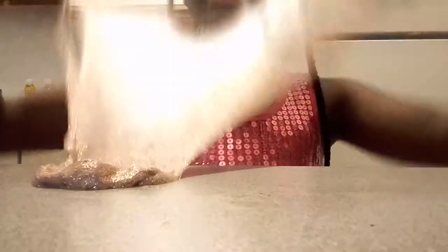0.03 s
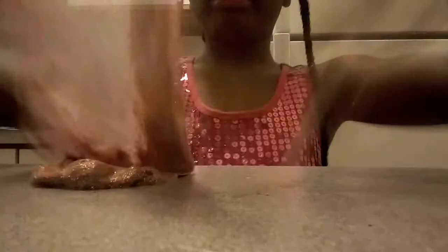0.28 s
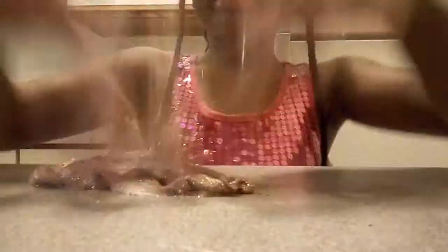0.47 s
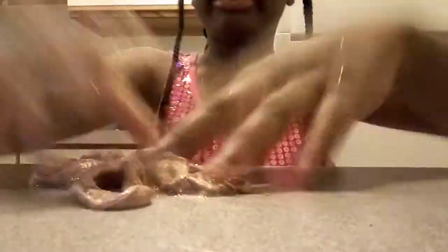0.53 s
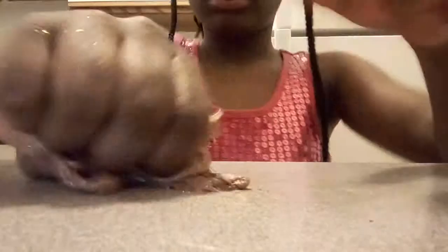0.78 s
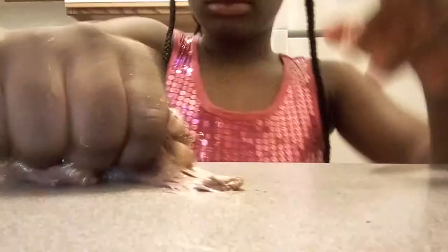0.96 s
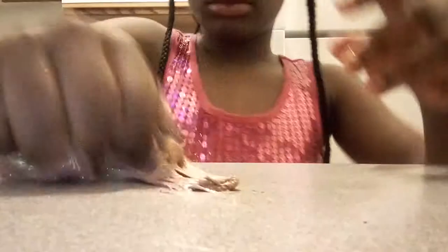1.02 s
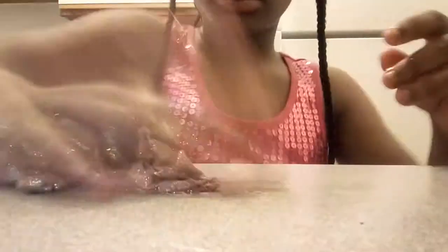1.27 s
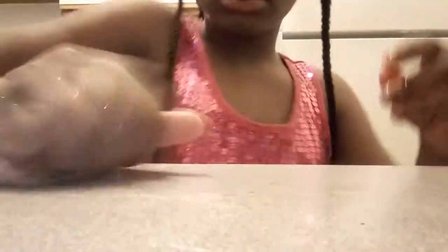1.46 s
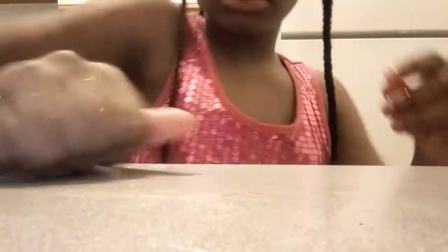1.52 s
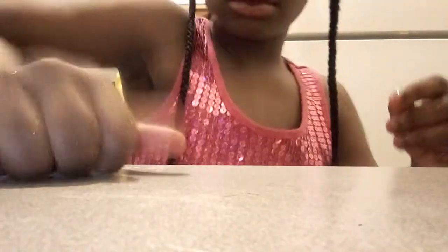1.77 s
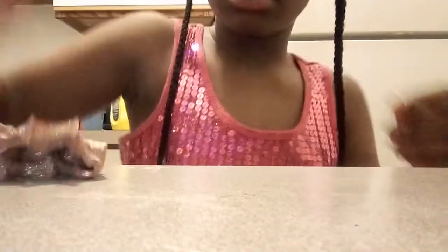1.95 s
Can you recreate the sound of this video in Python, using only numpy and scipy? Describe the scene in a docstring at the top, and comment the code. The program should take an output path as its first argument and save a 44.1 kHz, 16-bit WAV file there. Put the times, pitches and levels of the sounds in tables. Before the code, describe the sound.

Slime is slapped and kneaded close to the microphone, giving crisp air-pocket pops and sticky crackles in irregular clusters, with soft low counter thuds, in a small hard kitchen with faint hiss.

```python
"""Slime on a kitchen counter

Slime is slapped, pulled and pressed close to a phone microphone. Air pockets pop as ringing noise puffs
mixed with broad snaps, over a sticky crackle of random tiny snaps. Thuds ring the counter's modes, and
coloured noise makes it groan. A small hard room answers with a noise tail, over faint whistles, hum and hiss."""
import sys
import numpy as np
from scipy import signal
from scipy.fft import rfft, irfft
from scipy.io import wavfile

SR = 44100
rng = np.random.default_rng(int(sys.argv[2]) if len(sys.argv) > 2 else 0)


def unload_wav(signal):
    """Save mono or channel-first audio to the path in sys.argv[1] as 16-bit WAV at rate SR, clipped to [-1, 1]."""
    wavfile.write(
        sys.argv[1],
        SR,
        np.round(np.clip(np.atleast_2d(signal).T, -1, 1) * 32767).astype(np.int16),
    )


N = 88200  # length in samples: two seconds


# air pockets bursting: peak t/s, peak level/dB, pitch f/Hz, burst decay/ms, share of broad snap (0-1)
AIR_POPS = [(.137, -58, 5850, 2.3, 0), (.171, -56, 5560, 1.6, 0.4), (0.204, -19.5, 5900, 1.0, 0.74),
            (0.2048, -23, 4080, 1.1, 0.36), (.2048, -41.5, 1027, 4, 0), (0.2102, -19.5, 6300, 1.1, 0.14),
            (0.393, -43, 6000, .9, 0), (.4785, -51, 6360, 0.45, 0.3), (0.5529, -39.5, 5740, 1.7, 0),
            (0.5552, -44.5, 3600, 0.67, 0), (0.5737, -41, 6260, 0.44, 0.84),
            (0.608, -39.5, 3900, 0.63, 0.24), (.628, -19.5, 6550, .7, 0.64), (0.6299, -39, 893, 3.1, 0.1),
            (0.6598, -22.5, 4370, .6, 0.51), (0.6823, -38, 5100, .5, 0.4), (0.6941, -39, 6500, 0.86, 0.6),
            (0.7033, -23.5, 6250, 0.46, 1), (0.792, -38.5, 6200, .8, 0.05),
            (0.7909, -47.5, 2230, 0.6, 0.08), (0.902, -33, 2000, .6, 0.62), (.9042, -37, 1900, 1.2, 0.15),
            (.9048, -32, 2800, 1.4, .25), (0.9823, -32, 5300, 1.8, .1), (.986, -32, 5086, .3, 0.75),
            (1.103, -51.5, 6400, 1.8, .3), (1.204, -48, 2850, 1.4, 0.3), (1.2242, -40, 3130, 1.93, 0.64),
            (1.3464, -45, 6600, 0.29, 0.8), (1.3945, -24, 2910, .8, .05), (1.3946, -21, 7700, 1.2, 0.07),
            (1.4052, -23.5, 6300, 1.36, 0.86), (1.4419, -29, 6800, 0.2, 0.74),
            (1.4554, -40.5, 6760, .6, 0.4), (1.4617, -29, 6960, 2.7, 0.17), (1.4944, -27, 2700, 0.37, .7),
            (1.5135, -25.5, 2360, 0.31, 1), (1.6371, -47.5, 3700, 1.1, 0.04),
            (1.6741, -35, 7400, 1.5, 0.53), (1.738, -20, 6500, .9, 0.46), (1.7398, -35.5, 1570, 2.4, 0.23),
            (1.7418, -38, 6400, .6, 0.6)]
# colour of a pop's broad snap: f/Hz, relative level/dB
SNAP_COLOUR = [(500, -33.5), (1100, -26), (1800, -6), (2900, -3), (4000, -7), (6600, 3.5), (8500, -17),
               (12500, -23.5), (15000, -6), (16500, -8)]
POP_RISE_MS = 0.3
POP_CYCLES = 18  # cycles for the ringing to fall by 60 dB
POP_THIN = 0.5  # the low cut sits at this share of the pop's pitch
POP_CRACK = 2.7  # height of the click added to the snap's noise, whose spread is 1


def pops():
    """Each burst is a ragged puff that rings the pocket a few cycles, plus a broad snap."""
    out = np.zeros(N + SR)
    ms = np.arange(1500) / SR * 1000
    noises = rng.standard_normal((len(AIR_POPS), 2, len(ms)))
    for (s, db, hz, decay_ms, snap_share), (puff, crack) in zip(AIR_POPS, noises):
        shape = (1 - np.exp(-ms / POP_RISE_MS)) * np.exp(-ms / decay_ms)
        ringing = ring(puff * shape, hz, POP_CYCLES / hz)
        pocket = butter_filter(ringing, 4, POP_THIN * hz, "high")
        click = POP_CRACK * (np.arange(len(ms)) == shape.argmax())
        snap = colour((crack + click) * shape, SNAP_COLOUR)
        pop = (1 - snap_share) * rms_one(pocket) + snap_share * rms_one(snap)
        # line up the loudest sample with the listed time
        start = int(s * SR) - np.abs(pop).argmax()
        out[start:start + len(ms)] += from_db(db) * pop / np.abs(pop).max()
    return out[:N]


# sticky skin peeling in bursts: t/s near the peak, middle-band level/dB there, swell/ms, fade/ms,
# then treble and low-mid levels relative to the middle band/dB
PEELING = [(.142, -73, 5.7, 38, -8, 2), (0.174, -68, 5.6, 25, -1, 6), (.214, -47, 7.2, 34.3, 1.5, -2),
           (0.395, -58, 1.4, 2.9, -4, -13), (0.412, -55, 5.9, 10.3, -8, -22),
           (.462, -72, 2.7, 4.5, -11, -5), (.482, -54, 4.7, 30, -21, -7), (0.504, -52.5, 11, 15, 4, 8),
           (.556, -56.5, 45, 74, 2.5, 5.5), (0.625, -39.5, 3, 4.6, 2.8, -16),
           (0.646, -60, 3.3, 23, -16, 12), (.69, -59, 22, 30, -4, 9), (.795, -59, 20, 29, -2, -0.5),
           (0.863, -51, 16, 30, -6, -9), (.909, -60.5, 5.4, 59, 4.5, 11),
           (0.987, -41, 16.3, 12.7, 2.5, -2.5), (1.025, -53, 7.8, 9.9, 3, 4), (1.104, -67, 1.2, 8.2, -8, 7),
           (1.202, -61, 1.2, 4, -4, -3), (1.22, -54, 4.7, 4.2, 2, 7), (1.227, -59, 6.5, 13.2, 11, 18.5),
           (1.319, -54, 15, 28, 6.5, 0), (1.36, -65, 35, 43, 12, 10.5), (1.409, -42.5, 10, 19.6, -13, 0),
           (1.462, -58.5, 25, 26, 13.5, 14.5), (1.516, -53, 17, 17.3, -18, 9.5), (1.62, -57, 6, 41, 7, -25),
           (1.65, -50.5, 7.2, 12.4, 1, 2), (1.675, -52, 2.4, 16, 9.5, 3), (1.693, -49.5, 13, 19, 5.5, 10.5),
           (1.736, -33.5, 2.1, 3.7, -11, -18), (1.744, -62, 12, 19.7, -11, 23.5)]
# colour of the crackle through the microphone: f/Hz, relative level/dB
CRACKLE_COLOUR = [(300, -28), (600, -13.5), (1000, -11), (1500, -9.5), (2300, -8), (2900, -3.5), (3800, -7),
                  (5200, -3), (6600, 1), (7600, -8), (9500, -19), (13300, -31.5), (14300, -20.5),
                  (15300, -24.5), (16500, -5.5)]
LOW_MID_HZ, TREBLE_HZ = 2320, 8250  # borders between the dull, middling and bright bands
GRAINS_PER_S, GRAIN_SPREAD_DB = 9000, 3.5  # tiny snaps in each band, and how uneven they are
CLUMP_DB, CLUMP_HZ = 1.5, 120  # depth and speed of the drift in snap size


def crackle():
    """Thousands of uneven snaps a second in three bands; each squelch swells, fades and has its own colour."""
    extra_db = GRAIN_SPREAD_DB * np.minimum(rng.exponential(1, (3, N)), 5)
    sizes = from_db(extra_db) * rng.choice([-1, 1], (3, N))
    happens = rng.random((3, N)) < GRAINS_PER_S / SR
    clumps = from_db([CLUMP_DB * drift(CLUMP_HZ) for _ in range(3)])
    middle, bright, dull = [rms_one(colour(x, CRACKLE_COLOUR)) for x in sizes * happens * clumps]
    bands = [butter_filter(middle, 2, [LOW_MID_HZ, TREBLE_HZ], "band"),
             butter_filter(bright, 2, TREBLE_HZ, "high"),
             butter_filter(dull, 2, LOW_MID_HZ, "low")]
    power = np.zeros((3, N))
    for s, db, swell_ms, fade_ms, treble_db, low_db in PEELING:
        ms = (np.arange(N) / SR - s) * 1000
        # the limit of 50 keeps the exponentials from overflowing
        before = np.exp(np.minimum(-ms / swell_ms, 50))
        after = np.exp(np.minimum(ms / fade_ms, 50))
        band_gains = from_db([[db], [db + treble_db], [db + low_db]])
        power += (band_gains * 2 / (before + after)) ** 2
    return patchy(np.sum(np.sqrt(power) * bands, axis=0))


PATCH_DB, PATCH_HZ = 2.5, 25  # depth and speed of the drift in each narrow band


def patchy(x):
    """Each third of an octave swells and sinks on its own at random, making the crackle patchy."""
    edges = 900 * 2 ** np.arange(0, 4, 1 / 3)
    out = x
    for low, high in zip(edges, edges[1:]):
        gain = from_db(PATCH_DB * drift(PATCH_HZ) - PATCH_DB / 2)
        # add only the change, so a gain of 1 leaves the sound alone
        out = out + (gain - 1) * butter_filter(x, 1, [low, high], "band")
    return out


# hand or slime landing on the counter: start t/s, peak level/dB, brightness/dB per octave
LANDINGS = [(0.206, -38.5, 18), (.219, -44.5, -1), (0.431, -53, -4), (.46, -44, -27), (0.478, -39.5, -19),
            (0.5101, -25, 1.5), (0.516, -39, 0), (0.547, -48, -5), (0.994, -45, -5), (1.225, -40.5, 17),
            (1.235, -33, -5), (1.294, -43.5, -26), (1.394, -35, -3.5), (1.65, -56, 9), (1.689, -35.5, 6.5),
            (1.738, -39.5, 13)]
# ways the counter rings: f/Hz, level/dB before brightness and chance, time to fall 60 dB (t60)/s
COUNTER_MODES = [(140, 1, 0.065), (176, -13.5, 0.045), (213, 7, 0.04), (356.3, 3, 0.045),
                 (435.4, 0.5, 0.075), (613, -10, 0.077), (910, -13.5, .03)]
PUSH_MS = 0.74  # time for the bump behind the push to reach its peak


def thuds():
    """Soft pushes ring the counter's low modes; brighter blows favour the upper ones."""
    out = np.zeros(N + SR)
    t = np.arange(6000) / SR
    push = np.diff(t * np.exp(-t * 1000 / PUSH_MS), prepend=0)
    chances_db = rng.normal(0, 2, (len(LANDINGS), len(COUNTER_MODES)))
    for (s, db, tilt_db), chance_db in zip(LANDINGS, chances_db):
        thud = np.zeros(len(t))
        for (hz, mode_db, t60), extra_db in zip(COUNTER_MODES, chance_db):
            total_db = mode_db + extra_db + tilt_db * np.log2(hz / 250)
            thud += from_db(total_db) * ring(push, hz, t60)
        start = int(s * SR)
        out[start:start + len(t)] += from_db(db) * thud / np.abs(thud).max()
    return out[:N]


# counter groaning under the pressing hand: t/s, level/dB before a small random drift
PRESS_LEVEL = [(0, -69.5), (.085, -71.5), (.11, -80.5), (.2, -62.5), (.23, -59), (.28, -80), (.4, -72.5),
               (.45, -62.5), (.53, -49.5), (.58, -56), (.66, -66.5), (.8, -78), (.92, -78), (1.01, -58.5),
               (1.08, -73), (1.18, -63), (1.26, -54), (1.37, -59), (1.43, -63), (1.52, -68.5), (1.58, -85),
               (1.66, -58), (1.72, -58.5), (1.8, -70), (1.86, -85), (1.9, -70), (2, -83)]
# colour of the groan: f/Hz, relative level/dB
GROAN_COLOUR = [(30, -5), (60, -7), (110, -2), (200, -4.5), (350, -14), (600, -14.5), (1200, -57.5)]


def pressing():
    """Lumpy low noise in the counter while the hand bears down."""
    groan = rms_one(colour(rng.standard_normal(N), GROAN_COLOUR))
    return from_db(level_curve(PRESS_LEVEL) + 1.2 * drift(28)) * groan


# faint short whistles: middle t/s, pitch f/Hz, rms level/dB at the middle
WHISTLE_BLIPS = [(.425, 1530, -80), (1.845, 803, -69), (1.945, 1920, -80)]
WHISTLE_MS = 31  # time from the middle to 1/e of the height


def whistles():
    """Soft sine blips that swell and fade in a bell shape."""
    t, out = np.arange(N) / SR, np.zeros(N)
    for s, hz, db in WHISTLE_BLIPS:
        swell = np.exp(-((t - s) * 1000 / WHISTLE_MS) ** 2)
        # a sine with rms 1 has height sqrt(2)
        out += from_db(db) * np.sqrt(2) * np.sin(2 * np.pi * hz * t) * swell
    return out


# how long the room rings: f/Hz, time to fall 60 dB (t60)/s
ROOM_DECAY = [(200, 0.1), (900, 0.24), (2500, 0.21), (5500, .19), (10000, .11), (16000, 0.18)]
ROOM_GAP_MS = 6.2  # how slowly the tail builds up


def kitchen(x):
    """Diffuse tail: noise in half-octave bands, each dying at its own rate."""
    t = np.arange(SR // 2) / SR
    tail = np.zeros(len(t))
    edges = 80 * 2 ** np.arange(0, 8.1, 0.5)
    for low, high in zip(edges, edges[1:]):
        band = butter_filter(rng.standard_normal(len(t)), 2, [low, high], "band")
        t60 = at_hz(ROOM_DECAY, np.sqrt(low * high))
        tail += band * from_db(-60 * t / t60)
    tail *= 1 - np.exp(-(t * 1000 / ROOM_GAP_MS) ** 2)
    return signal.fftconvolve(x, tail / np.sqrt(np.sum(tail ** 2)))[:N]


# faint hum, strongest in the second half: t/s, level/dB
HUM_LEVEL = [(0.0, -77), (0.47, -89.5), (0.6, -115), (0.93, -69), (1.11, -67.5), (1.39, -65.5), (1.49, -70),
             (1.88, -73), (2.0, -76.5)]
# colour of the microphone hiss: f/Hz, relative level/dB
HISS_COLOUR = [(25, 1.5), (60, 12), (120, -25.5), (240, -6), (450, -7.5), (850, -7), (1400, -13.5),
               (2500, -17), (4000, -21), (6500, -17.5), (9000, -34.5), (12500, -33), (15200, -22.5),
               (16500, -24)]
HISS_DB = -73  # rms level
HUM_HZ, HUM_WIDTH_HZ = 867.5, 132  # pitch, and width of each of the two resonators


def background():
    """Microphone hiss, plus a narrow wavering hum made by ringing noise twice."""
    t60 = np.log(1000) / (np.pi * HUM_WIDTH_HZ)
    once = ring(rng.standard_normal(N), HUM_HZ, t60)
    hum = rms_one(ring(once, HUM_HZ, t60))
    hiss = rms_one(colour(rng.standard_normal(N), HISS_COLOUR))
    return from_db(level_curve(HUM_LEVEL)) * hum + from_db(HISS_DB) * hiss


def from_db(db):
    """Turn decibels into a gain to multiply by."""
    return 10 ** (np.asarray(db) / 20)


def rms_one(x):
    """Scale a sound to rms (average strength) 1."""
    return x / np.sqrt(np.mean(x ** 2) + 1e-20)


def level_curve(rows):
    """Join the listed levels with straight lines, one value a sample."""
    s, db = np.transpose(rows)
    return np.interp(np.arange(N) / SR, s, db)


def at_hz(points, hz):
    """Read a table at any frequency, on a log-frequency axis."""
    f, value = np.transpose(points)
    return np.interp(np.log(hz + 1), np.log(f), value)


def butter_filter(x, order, hz, kind):
    """Butterworth filter: keep the low, high or band part of a sound."""
    return signal.sosfilt(signal.butter(order, hz, kind, fs=SR, output="sos"), x)


def colour(x, spectrum, size=4096):
    """Give a sound the listed spectrum with a causal (minimum-phase) filter."""
    log_gain = at_hz(spectrum, np.linspace(0, SR / 2, size // 2 + 1)) * np.log(10) / 20
    # folding the cepstrum forward makes the filter respond as early as possible
    cepstrum = irfft(log_gain)
    cepstrum[1:size // 2] *= 2
    cepstrum[size // 2 + 1:] = 0
    return signal.fftconvolve(x, irfft(np.exp(rfft(cepstrum))))[:len(x)]


def drift(hz):
    """Slow random wandering with rms 1: noise smoothed twice."""
    r = np.exp(-2 * np.pi * hz / SR)
    # the first second lets the filter settle
    noise = rng.standard_normal(N + SR)
    return rms_one(signal.lfilter([1], [1, -2 * r, r * r], noise)[SR:])


def ring(x, hz, t60):
    """Resonator: a unit click sets a dying sine of starting height about 1 ringing."""
    r, w = from_db(-60 / (t60 * SR)), 2 * np.pi * hz / SR
    # the tiny offset keeps silence from becoming slow, minute numbers
    return signal.lfilter([0, np.sin(w)], [1, -2 * r * np.cos(w), r * r], x + 1e-18)


ROOM_DB, ROOM_THUD_DB = -14.5, -10  # how strongly slime and thuds feed the room


def scene():
    """Slime, counter, room, whistles and background added together, in mono."""
    slime = pops() + crackle()
    counter = thuds()
    room = kitchen(from_db(ROOM_DB) * slime + from_db(ROOM_THUD_DB) * counter)
    return (slime + counter + pressing() + room + background() + whistles())[None]


BASS_CUT_HZ, TOP_STOP_HZ = 109.4, 16600  # the top is 60 dB down from the second one upward


def record(dry):
    """The phone microphone loses the deep bass; the top is cut steeply."""
    thin = butter_filter(dry, 2, BASS_CUT_HZ, "high")
    return signal.sosfilt(signal.cheby2(14, 60, TOP_STOP_HZ, fs=SR, output="sos"), thin)


dry = scene()
out = record(dry)
unload_wav(out)
```